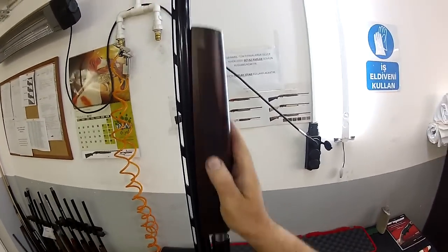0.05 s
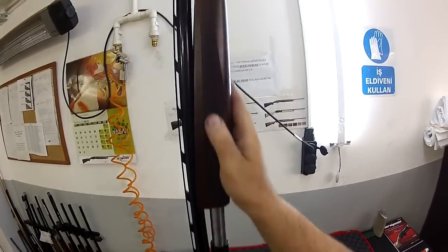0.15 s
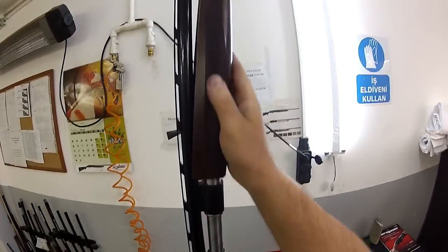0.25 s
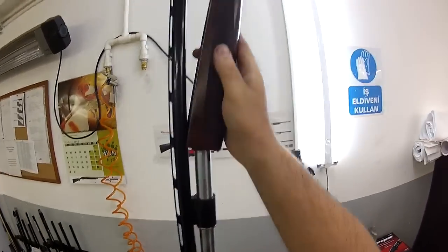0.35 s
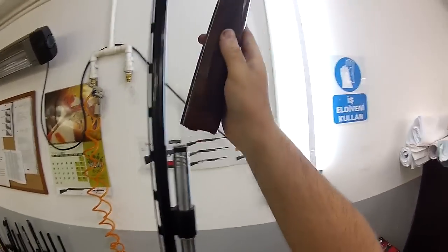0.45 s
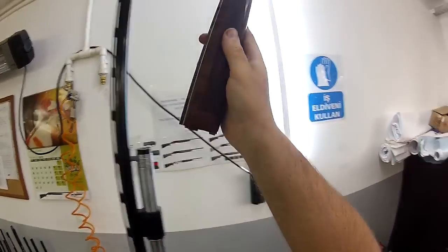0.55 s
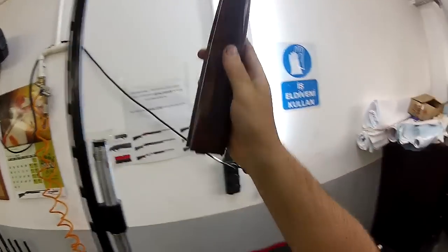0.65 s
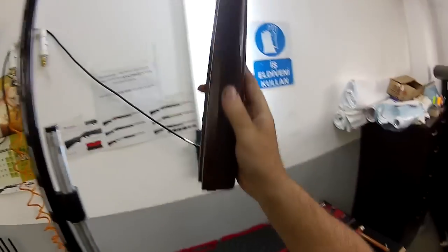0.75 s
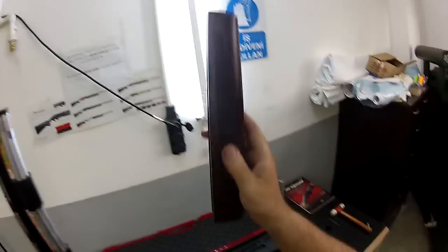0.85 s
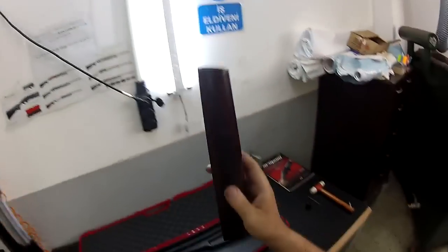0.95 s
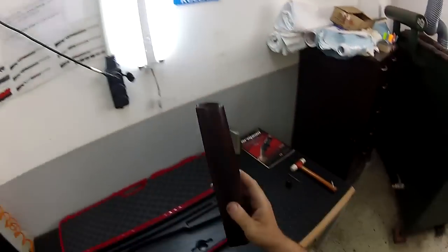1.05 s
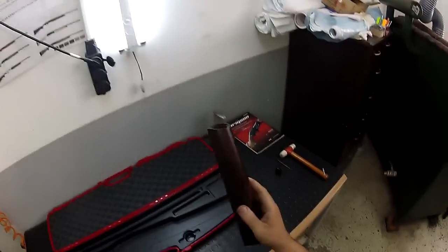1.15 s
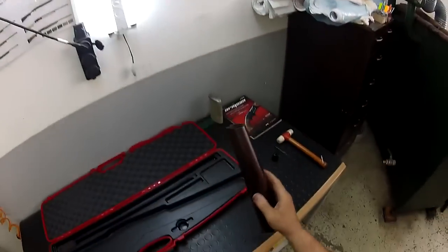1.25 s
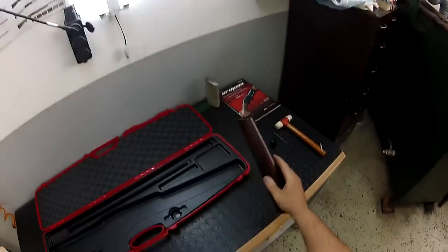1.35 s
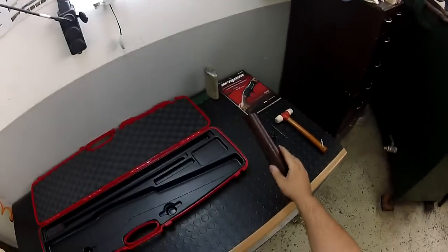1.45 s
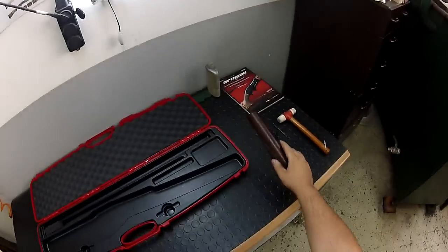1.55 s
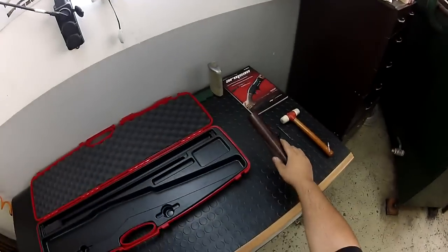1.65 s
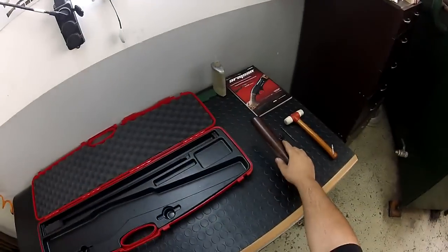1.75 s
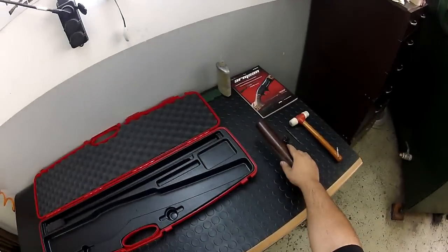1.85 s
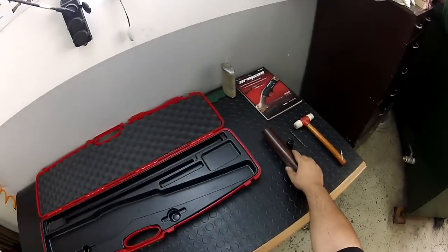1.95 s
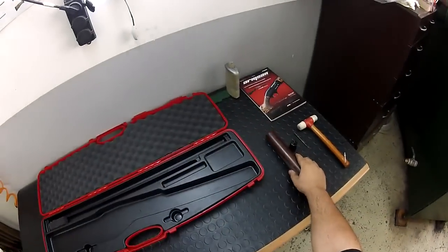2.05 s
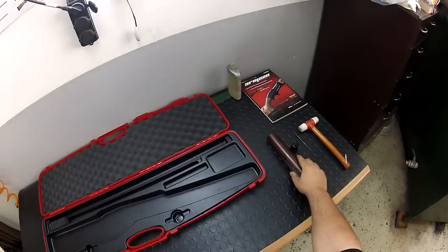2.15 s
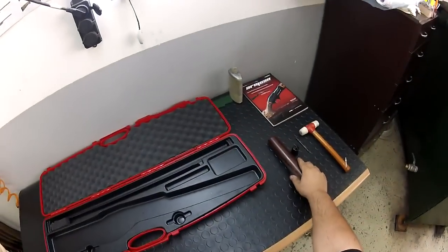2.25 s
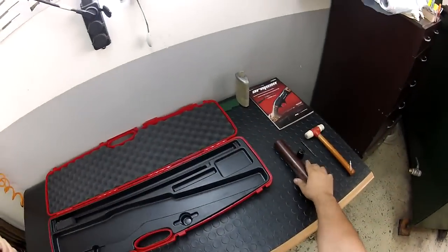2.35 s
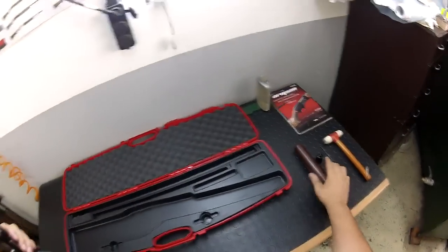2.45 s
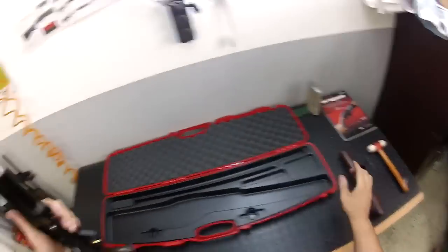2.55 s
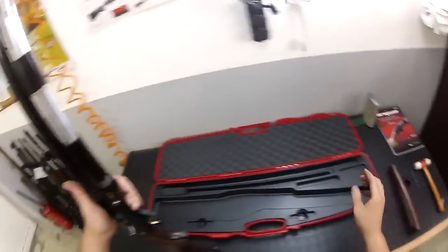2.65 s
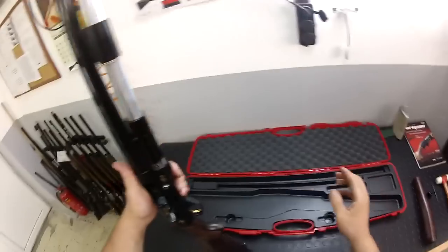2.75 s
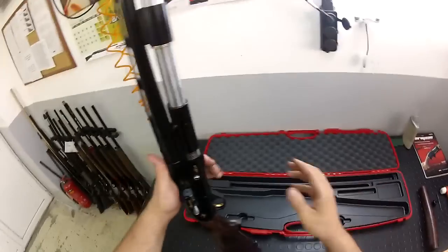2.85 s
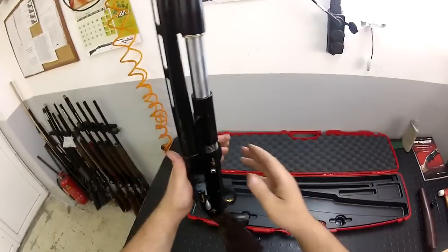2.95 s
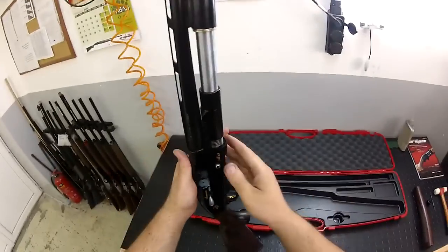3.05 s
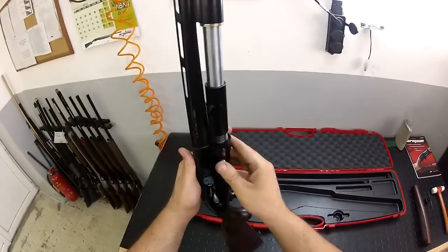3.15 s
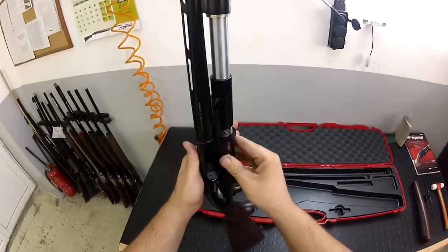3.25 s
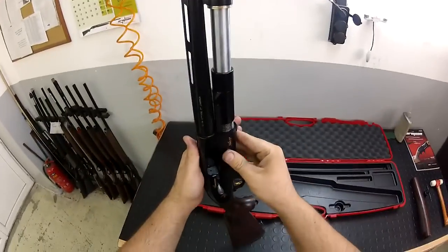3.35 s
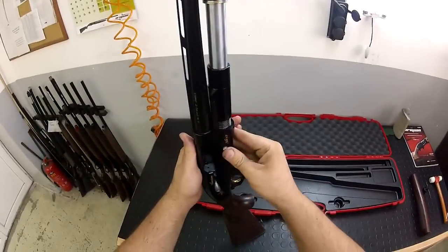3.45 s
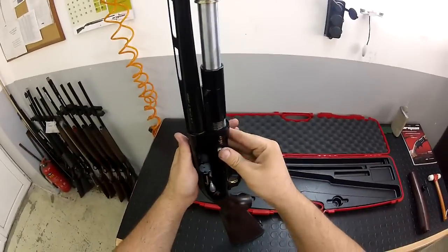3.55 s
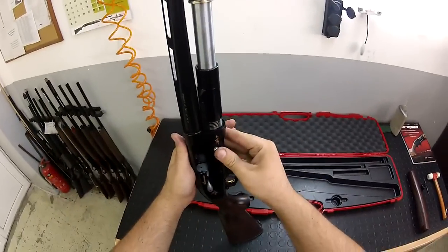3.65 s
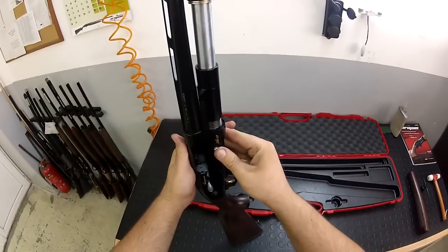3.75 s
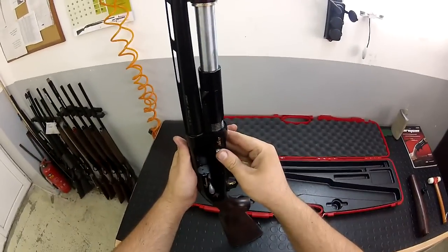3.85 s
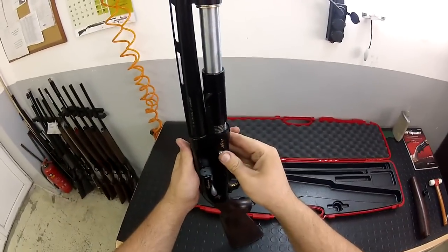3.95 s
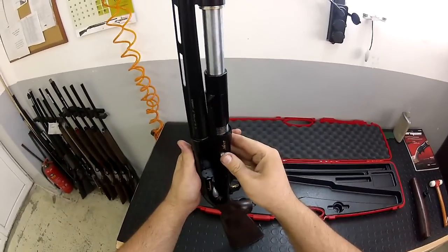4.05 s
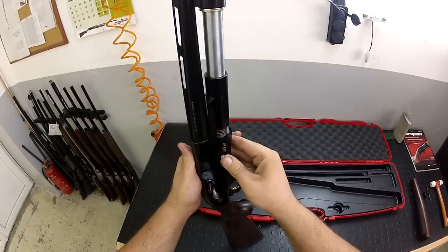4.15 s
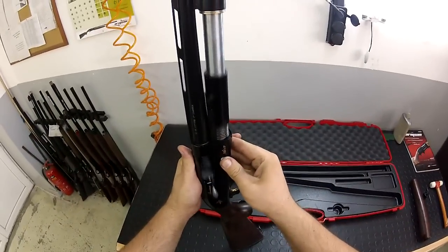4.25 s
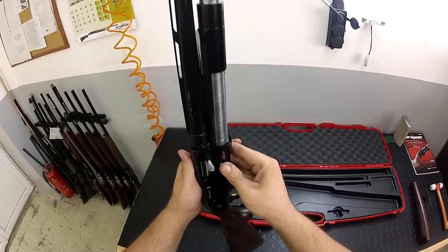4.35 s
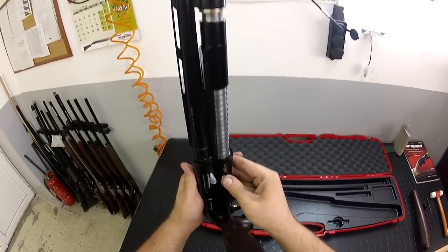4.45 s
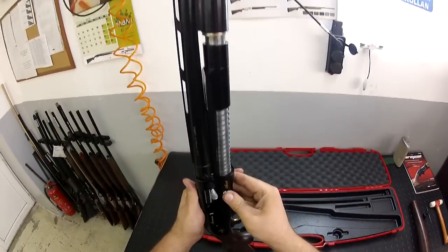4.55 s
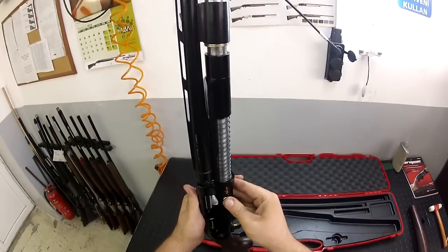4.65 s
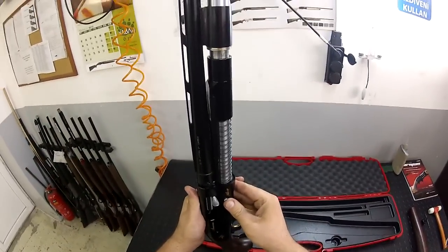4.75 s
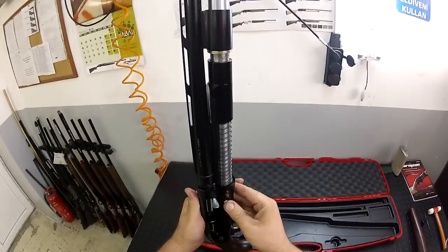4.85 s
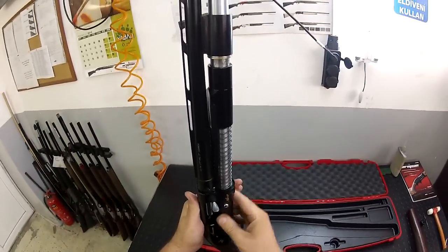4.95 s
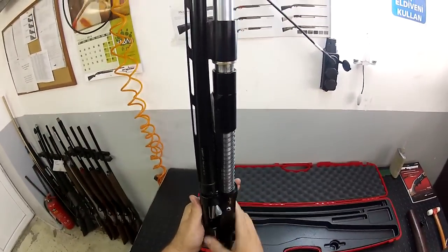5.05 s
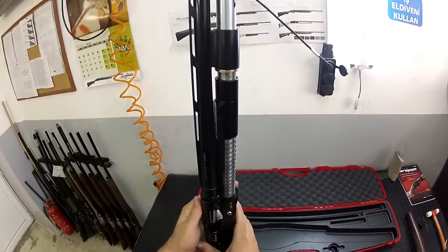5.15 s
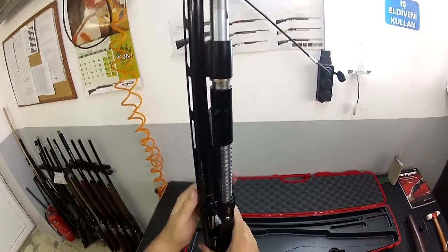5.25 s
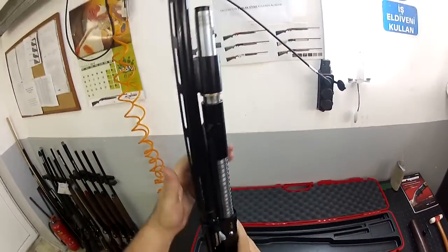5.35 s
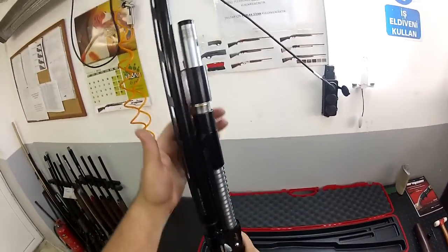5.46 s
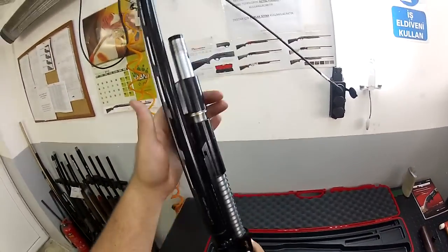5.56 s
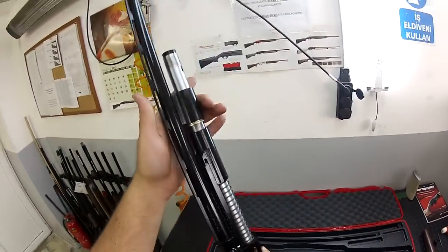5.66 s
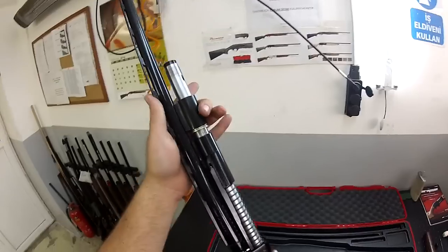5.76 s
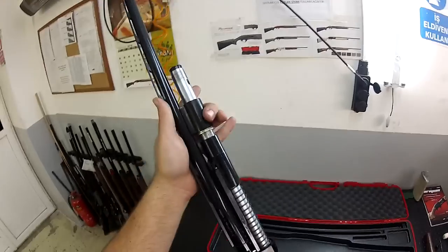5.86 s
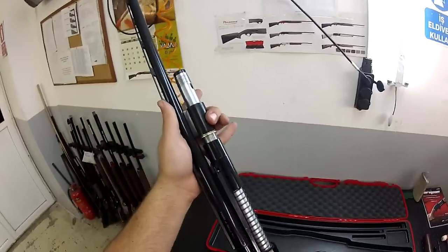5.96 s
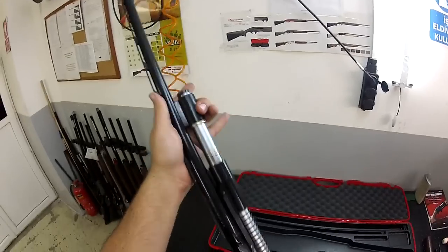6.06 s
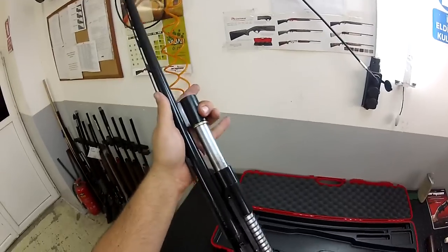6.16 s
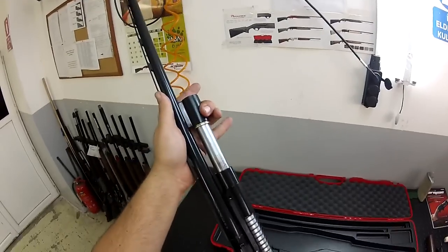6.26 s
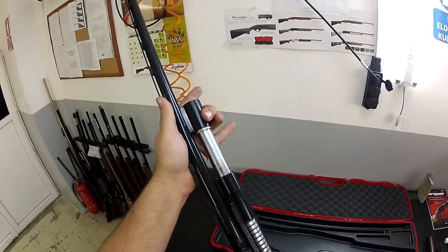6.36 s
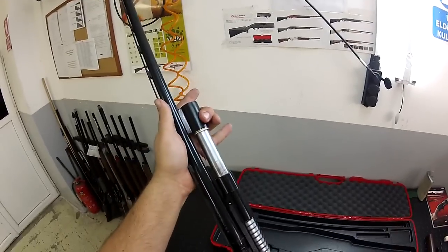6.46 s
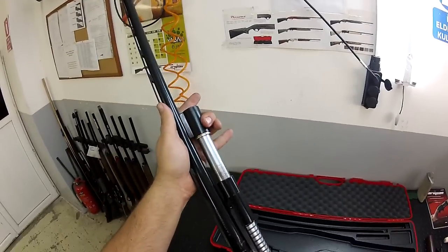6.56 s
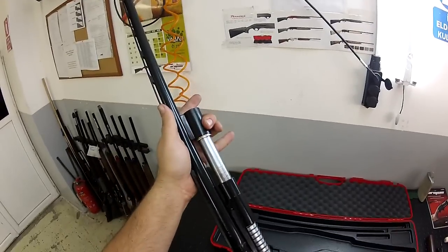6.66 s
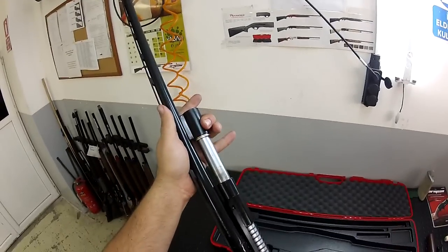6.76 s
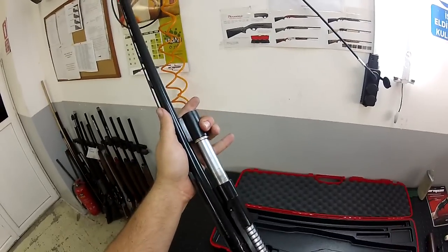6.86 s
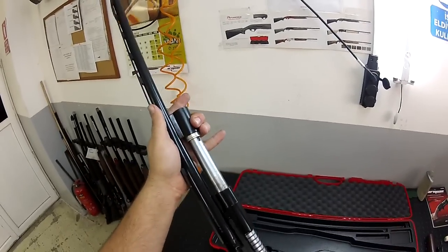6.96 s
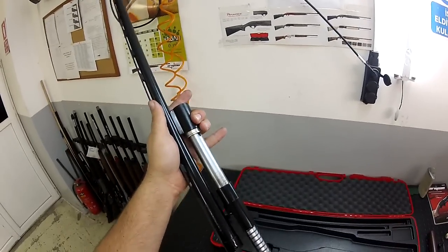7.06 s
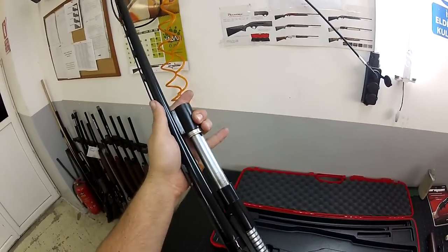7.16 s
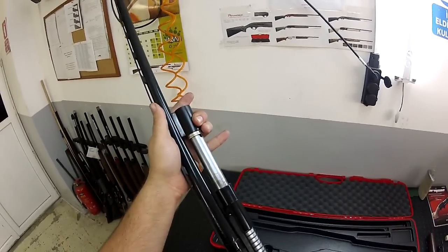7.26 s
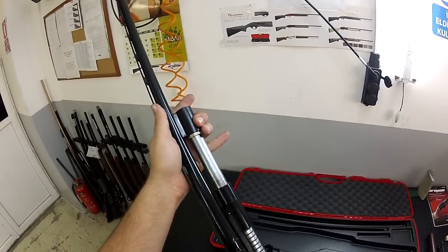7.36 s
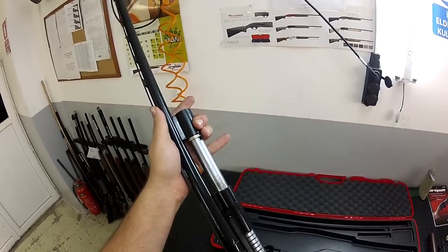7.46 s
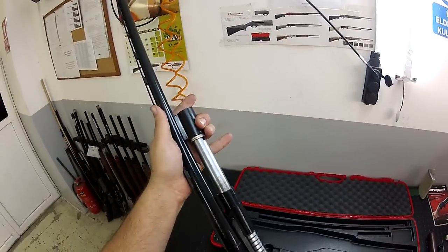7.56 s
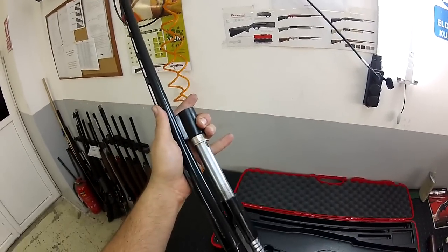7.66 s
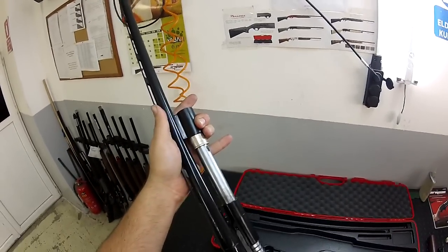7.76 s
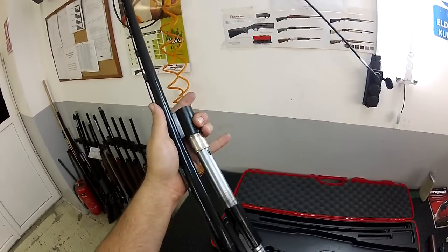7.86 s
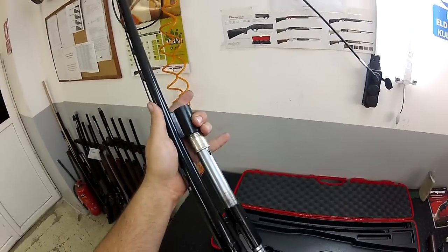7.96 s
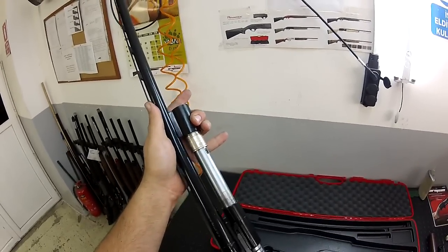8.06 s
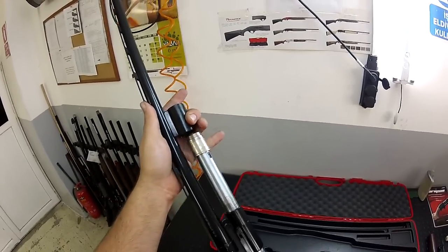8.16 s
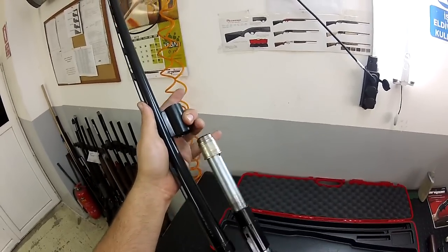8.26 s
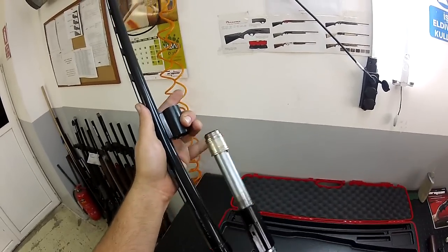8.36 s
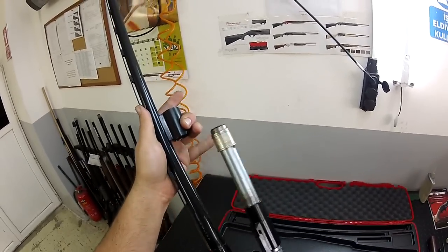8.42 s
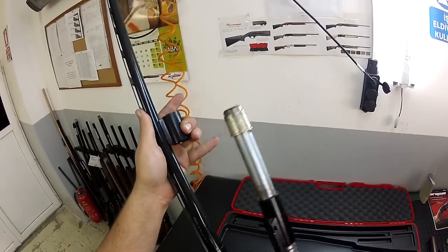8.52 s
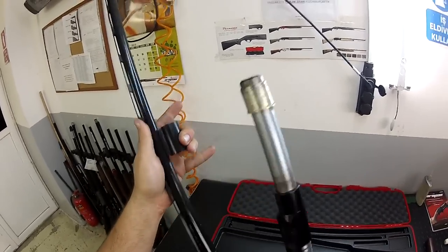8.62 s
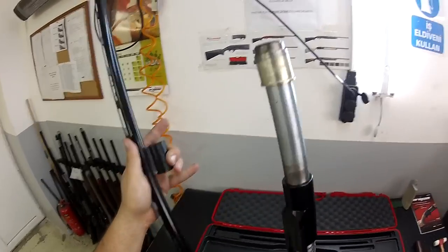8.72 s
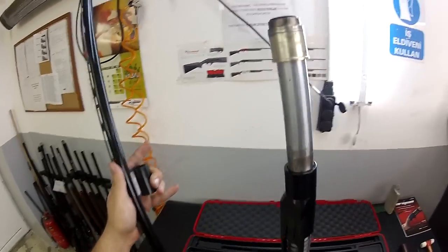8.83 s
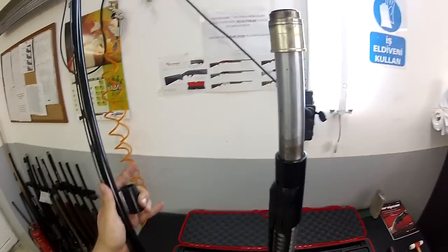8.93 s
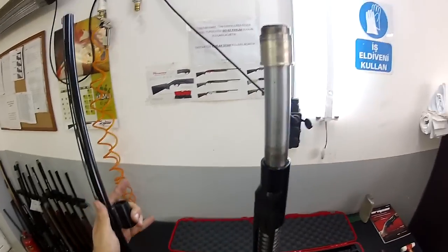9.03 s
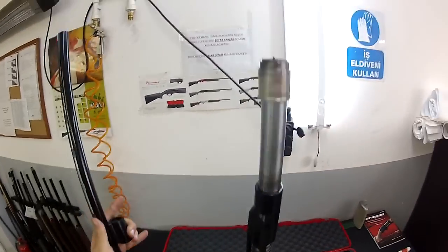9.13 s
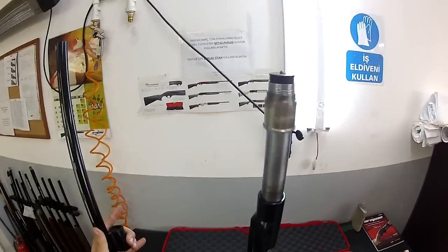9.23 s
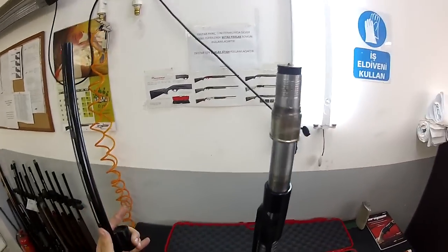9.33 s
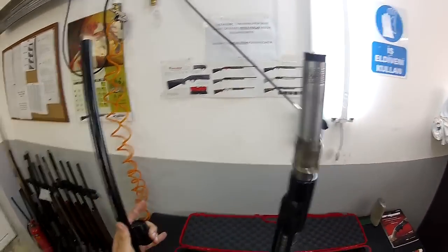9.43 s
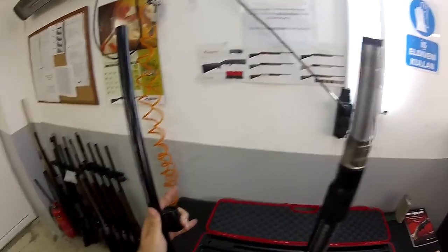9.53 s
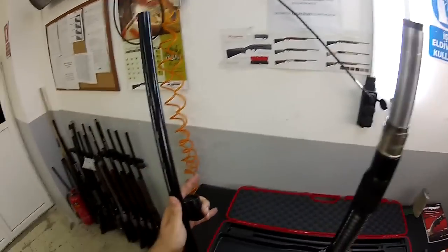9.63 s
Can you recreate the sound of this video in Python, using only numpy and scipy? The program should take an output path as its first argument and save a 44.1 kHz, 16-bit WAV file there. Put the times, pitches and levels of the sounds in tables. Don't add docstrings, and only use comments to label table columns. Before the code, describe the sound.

A small, hard-walled workshop, heard close from a chest-worn microphone, nearly mono with gritty, coarse treble. Low fan rumble, hiss and faint electric buzz continue throughout. From 0 to 0.5 seconds, steel rubs faintly, squeaks thinly and gives a few light clicks. At 2.1 a wooden grip lands on the bench with a short dull knock. Near-quiet follows until 4.3, when a catch clicks and steel slams home, by far the loudest event, clipped and bright, rattling and ringing into the room. A tiny tick comes at 5.6; a second hard catch clacks at 6.15. Barrel clicks cluster at 6.8 and 7.0, with light ticks around them. From 7.7 to 8.2 a loose ring scrapes, clicks and squeaks softly along the tube. At 9.25 muffled low bumps and a fading scrape sound as the stock bounces against the chest; a sharp snap follows at 9.5.

```python
import sys
import numpy as np
from scipy import signal
from scipy.fft import rfft, irfft
from scipy.io import wavfile
from scipy.ndimage import uniform_filter1d

SR = 44100
rng = np.random.default_rng(int(sys.argv[2]) if len(sys.argv) > 2 else 0)


def gain_from_decibels(decibels):
    exponent = np.asarray(decibels, float) / 20
    return 10 ** exponent


def transcribe(u):
    v = np.clip(np.atleast_2d(u).T, -1, 1)
    q = np.round(v * 32767).astype(np.int16)
    wavfile.write(sys.argv[1], SR, q)


N = 427327

# frequency in Hz, level in dB per Hz.
STEEL_COLOUR = [(200, -45), (400, -29.5), (700, -20.5), (1000, -9), (1400, -23.5), (1750, -5.5),
                (2100, -0.5), (2700, 1), (3300, -6), (4100, -2.5), (4600, -12.5), (5100, -3), (5600, -18),
                (6000, -18.5), (7500, -34.5)]


def evened(x):
    return x / np.sqrt(np.mean(x ** 2) + 1e-20)


def read(points, hz):
    f, value = np.transpose(points)
    return np.interp(np.log(hz + 1), np.log(f + 1), value)


def add(mix, s, sound):
    part = mix[round(s * SR):][:len(sound)]
    part += sound[:len(part)]


def coloured(x, points):
    hz = abs(np.fft.fftfreq(4096, 1 / SR))
    log_gain = np.log(gain_from_decibels(np.maximum(read(points, hz), -70)))
    phase = -signal.hilbert(log_gain).imag
    taps = np.fft.ifft(np.exp(log_gain + 1j * phase)).real[:2048]
    return signal.oaconvolve(x, taps)[:len(x)]


def resonate(x, hz, width_hz):
    turn = np.exp(2j * np.pi * np.cumsum(hz * np.ones(len(x))) / SR)
    r = np.exp(-np.pi * width_hz / SR)
    return 2 * (turn * signal.lfilter([1 - r], [1, -r], x / turn)).real


def click(s, peak_db, note_hz, body_db, edge_db, looseness):
    t = np.arange(round(.25 * SR)) / SR
    t60 = 0.011 * gain_from_decibels(32.4 * np.clip(looseness, 0, 1))
    attack = np.minimum(t / 0.00056, 1)
    rattle = rng.standard_normal(len(t)) * gain_from_decibels(-60 * t / t60) * attack
    rattle[20] += 4
    z = rfft(rattle)
    rattle = irfft(z / abs(z) ** .7, len(t)) * gain_from_decibels(-20 * t / t60)
    tilt = [(1200, body_db + 20.5), (1800, 0.00097), (3000, 0), (4000, edge_db + 11.5)]
    struck = evened(coloured(coloured(rattle, STEEL_COLOUR), tilt))
    struck = struck + gain_from_decibels(-9) * evened(resonate(rattle, note_hz, 160))
    return s, gain_from_decibels(peak_db) * struck / abs(struck).max()


def clicks():
    # start in seconds, peak in dB, ringing note in Hz, looseness 0-1.
    scuffs = [
        (.1446, -31, 1930, 0.3),
        (.4594, -40, 2800, .28),
        (9.2364, -26, 1940, 0.23),
    ]
    latch_clicks = [(.2848, -32.5, 2740, .6), (.3037, -30, 3100, .5), (.3391, -28.5, 2060, .3),
                    (.4179, -21, 2890, 0.73), (.4295, -23.5, 2000, 0.71)]
    nudges = [(5.6331, -45.5, 2300, 0.53), (6.0516, -37.5, 2440, .5), (6.4966, -36.5, 2370, .2),
              (7.3213, -38, 1920, .4), (7.429, -44.5, 2150, .3), (8.0406, -38.5, 3030, .3),
              (8.6602, -43, 2050, .3)]
    barrel_clicks = [(6.777, -13, 3785, .45), (6.7994, -20.5, 2140, .6), (6.8314, -24.5, 2100, .3),
                     (6.9576, -36, 3570, .6), (6.9885, -17, 2640, 0.58), (7.0001, -22, 2440, .45)]
    ring_clicks = [(6.5121, -27, 3920, .32), (7.2454, -29, 3770, 0.23), (7.6959, -28, 2550, 0.51),
                   (7.7144, -27, 2360, 0.18), (7.7344, -25, 2320, .2), (7.9259, -39, 1940, 0.52),
                   (7.9414, -24, 2510, .66), (8.0656, -31.5, 2790, 0.4)]
    catches = [
        (4.311, -28, 4200, .5),
        (4.325, -9, 2700, .7),
        (4.342, 2, 4200, .55),
        (6.118, -27, 2100, .5),
        (6.128, -21, 3700, .6),
        (6.157, -2.5, 4600, .38),
    ]
    slams = [
        (4.3634, 15, 2646, 0.38),
        (4.369, 6, 3190, 1),
    ]
    snaps = [
        (9.5183, -7.5, 4300, 0.45),
    ]
    # contacts, body in dB, edge in dB.
    parts = [(scuffs, 0, -12.5), (latch_clicks, -17.5, -14), (nudges, -12, -11), (barrel_clicks, -32, -17.5),
             (ring_clicks, -23, -9), (catches, -24, -4.5), (slams, -26, -6), (snaps, -28, -4)]
    steel = np.zeros(N)
    for rows, body_db, edge_db in parts:
        for s, peak_db, note_hz, looseness in rows:
            add(steel, *click(s, peak_db, note_hz, body_db, edge_db, looseness))
    return steel


def slide(start, length, start_db, end_db, hz):
    t = np.arange(start, start + length, 1 / SR)
    unevenness = evened(uniform_filter1d(rng.standard_normal(len(t)), 90))
    grains = rng.standard_normal(len(t)) * gain_from_decibels(1.7 * unevenness)
    rub = evened(coloured(grains, STEEL_COLOUR)) + 0.43 * evened(resonate(grains, hz, 260))
    pressure_db = np.interp(t, [start, start + length], [start_db, end_db])
    return start, gain_from_decibels(pressure_db - 3) * evened(rub) * signal.windows.tukey(len(t), .1)


def slides():
    # start in seconds, length in seconds, level at start in dB, at end in dB, resonance in Hz.
    strokes = [
        (0.0, .144, -43.5, -50.5, 2940),
        (.13, .23, -51, -45.5, 2120),
        (4.314, .026, -38.5, -10, 2830),
        (6.126, 0.029, -30, -21.5, 2740),
        (7.68, .03, -43.5, -39.5, 2400),
        (7.712, .09, -26.5, -46, 2320),
        (7.994, .1, -49.5, -41, 3040),
        (8.09, .13, -54, -53.5, 2600),
        (9.235, .16, -36.5, -57, 2050),
    ]
    steel = np.zeros(N)
    for row in strokes:
        add(steel, *slide(*row))
    return steel


def sleeve(steel):
    # start in seconds, end in seconds.
    loose_spans = [
        (6.505, 6.7),
        (7.24, 7.3),
        (7.65, 8.3),
    ]
    # frequency in Hz, width in Hz, level in dB.
    sleeve_bands = [(2050, 70, 2.5), (2400, 76, 0.5), (3170, 60, 6), (3680, 74, 6), (5340, 150, -7)]
    out = np.zeros(N)
    for start, end in loose_spans:
        loose_steel = steel[round(start * SR):round(end * SR)]
        bands = sum(gain_from_decibels(db) * resonate(loose_steel, hz, width_hz) for hz, width_hz, db in sleeve_bands)
        add(out, start, bands - 0.39 * loose_steel)
    return out


def tube(steel):
    # frequency in Hz, level in dB, t60 in seconds.
    tube_modes = [(2003, 2, 0.93), (2068, -0.5, 0.35), (2230, -10, .4), (2440, -15, .4), (2675, 4.5, 0.23),
                  (2825, -1, .5), (3070, 6, .4), (3170, 6, 0.48), (3376, -12, .5), (3905, -8, .4),
                  (3980, -2, 0.12)]
    t = np.arange(SR) / SR
    ringing = sum(gain_from_decibels(db - 60 * t / t60) * np.sin(2 * np.pi * hz * t) for hz, db, t60 in tube_modes)
    return gain_from_decibels(-33) * 2 * signal.fftconvolve(steel, ringing / np.linalg.norm(ringing))[:N]


def squeak(s, length, hz, level_db):
    width_hz = 75
    noise = rng.standard_normal(round(length * SR))
    note = resonate(resonate(noise, hz, width_hz), hz, width_hz)
    return s, gain_from_decibels(level_db) * evened(note) * signal.windows.tukey(len(note), .5)


def squeaks():
    # start in seconds, length in seconds, frequency in Hz, level in dB.
    squeak_rows = [(.003, 0.018, 2000, -46), (0.028, .02, 4030, -46), (.04, 0.013, 1047, -38.5),
                   (.051, 0.034, 2880, -38), (0.092, 0.03, 3174, -47), (.125, .04, 3000, -53),
                   (.145, 0.038, 1860, -46.5), (.144, 0.01, 1030, -43), (.168, .018, 1043, -41.5),
                   (.2, 0.07, 1060, -50), (.47, 0.073, 2000, -54), (6.494, 0.014, 2400, -42.5),
                   (6.981, .008, 5320, -36), (7.655, 0.074, 2620, -52), (7.692, .03, 5100, -46.5),
                   (7.71, 0.051, 2413, -36.5), (7.945, 0.068, 3170, -52), (8.07, 0.137, 3170, -55.5),
                   (8.143, 0.044, 4380, -56)]
    out = np.zeros(N)
    for row in squeak_rows:
        add(out, *squeak(*row))
    return out


def thud(s, peak_db, hz, t60, rough_share):
    t = np.arange(round(.8 * SR)) / SR
    noise = rng.standard_normal(len(t))
    rough = evened(resonate(resonate(noise, hz, .4 * hz), hz, .4 * hz))
    share = np.clip(rough_share, 0, 1)
    tone = np.sin(2 * np.pi * hz * t)
    return s, gain_from_decibels(peak_db - 60 * t / t60) * ((1 - share) * tone + share * rough)


def bodies():
    # frequency in Hz, level in dB, t60 in seconds, rough share 0-1.
    grip_modes = [(152, -17, .13, 0.57), (292, -14, 0.09, 0.9), (661, 0.5, 0.028, 0),
                  (945, -7.5, 0.073, 0.72), (1780, -19, 0.087, 0.3), (2000, -13.5, 0.068, .9),
                  (2720, -6, 0.025, 0.19), (4220, -28.5, .035, 1)]
    receiver_modes = [(140, -6, 0.15, 0), (230, -3, 0.07, 0.7), (424, -2.5, .03, 0.3), (1000, -9, .05, 0.5),
                      (4240, -24, 1.2, 0.05)]
    barrel_modes = [(720, -6, 0.039, 0.316), (1106, -4.5, 0.086, 0.39), (2060, -3, 0.38, .05)]
    stock_modes = [(627, -1, 0.17, 0.79), (1120, -1, 0.204, 1), (2000, -5, 0.57, 0.91)]
    # start in seconds, peak in dB.
    grip_blows = [
        (2.0645, -11.5),
    ]
    receiver_blows = [
        (4.363, -7),
    ]
    barrel_blows = [
        (4.326, -25.5),
        (6.136, -32),
        (6.1585, -30),
        (6.7775, -25.5),
    ]
    stock_blows = [
        (9.241, -33),
    ]
    out = np.zeros(N)
    for blows, modes in [(grip_blows, grip_modes), (receiver_blows, receiver_modes),
                         (barrel_blows, barrel_modes), (stock_blows, stock_modes)]:
        for s, peak_db in blows:
            for hz, db, t60, rough_share in modes:
                add(out, *thud(s, peak_db + db, hz, t60, rough_share))
    return out


def chest():
    # start in seconds, peak in dB, frequency in Hz.
    sways = [
        (6.1251, -30, 26),
        (6.166, -25.5, 38),
        (6.8101, -29, 28),
        (7.0151, -27, 37),
    ]
    bounces = [
        (9.2314, -17.5, 267),
        (9.2476, -14, 266),
        (9.262, -18, 169),
        (9.2878, -16.5, 120),
        (9.3077, -29, 196),
        (9.3417, -21, 185),
    ]
    out = np.zeros(N)
    for s, peak_db, hz in sways:
        add(out, *thud(s, peak_db, hz, t60=0.19, rough_share=.06))
    for s, peak_db, hz in bounces:
        add(out, *thud(s, peak_db, hz, t60=0.068, rough_share=.13))
    return out


def room(x):
    # frequency in Hz, t60 in seconds, level in dB.
    room_bands = [(120, 0.6, 1.5), (400, .6, -1.5), (1000, 0.63, 2.5), (2000, 0.67, 1), (3040, 0.66, -0.5),
                  (4300, 0.61, -6), (5430, 0.65, 0.5)]
    onset = np.clip((np.arange(SR) / SR - .004) / .012, 0, 1)
    hz, t, z = signal.stft(rng.standard_normal(SR) * onset, SR, nperseg=256)
    f, t60, level_db = np.transpose(room_bands)
    fade_db = np.interp(hz, f, level_db)[:, None] - 60 * t / np.interp(hz, f, t60)[:, None]
    tail = signal.istft(z * gain_from_decibels(fade_db), SR, nperseg=256)[1]
    return gain_from_decibels(-5.5) * signal.fftconvolve(x, tail / np.linalg.norm(tail))[:N]


def hiss(points):
    z = rfft(rng.standard_normal(N)) * gain_from_decibels(read(points, np.fft.rfftfreq(N, 1 / SR)))
    return evened(irfft(z, N))


def background():
    # frequency in Hz, level in dB per Hz.
    air_colour = [(5.9, -34.5), (10, -7.5), (38, 1.5), (70, -4), (120, -3), (149, -4.5), (179, 0),
                  (205, -5.5), (241, -4.5), (445, -10.5), (482, -13.5), (966, -19.5), (2150, -25),
                  (4680, -28), (5950, -35), (7740, -70), (13100, -120)]
    # multiple of the buzz's base frequency, level in dB.
    buzz_lines = [(1, -56.5), (2, -55), (3, -55), (4, -55.5), (5, -64), (6, -60.5), (7, -71.5), (8, -63),
                  (9, -67), (12, -74)]
    buzz_hz, fan_hz = 59.94, 2050
    turns = buzz_hz * np.arange(N) / SR
    throb = 1 + .05 * np.cos(2 * np.pi * turns)
    buzz = sum(np.sqrt(2) * gain_from_decibels(db) * np.cos(2 * np.pi * (k * turns + rng.random())) for k, db in buzz_lines)
    whine = evened(resonate(resonate(rng.standard_normal(N), fan_hz, 400), fan_hz, 400))
    return gain_from_decibels(-41) * hiss(air_colour) * throb + buzz + gain_from_decibels(-62) * whine


def ports():
    # frequency in Hz, level in dB per Hz.
    port_colour = [(5.9, -33), (10, -2), (74, -3), (254, -5), (314, -6), (566, -14), (3490, -16),
                   (5350, -15.5), (5950, -25), (7740, -51.5), (13100, -120)]
    return gain_from_decibels(-59.5) * hiss(port_colour)


def scene():
    steel = clicks() + slides()
    near = steel + sleeve(steel) + tube(steel) + squeaks() + bodies() + chest()
    mid = near + room(near) + background()
    side = ports()
    return np.array([mid + side, mid - side])


def low_pass(x):
    return signal.sosfilt(signal.butter(12, 15350, fs=SR, output="sos"), x)


def record(dry):
    coarse = signal.resample_poly(dry, 40, 147, axis=1)
    held = np.repeat(np.clip(coarse, -1, 1), 4, axis=1)
    smooth = signal.resample_poly(held, 147, 160, axis=1)
    smooth = np.pad(smooth, ((0, 0), (0, 8)))[:, :N]
    return low_pass(np.clip(smooth, -1, 1))


dry = scene()
out = record(dry)
transcribe(out)
```